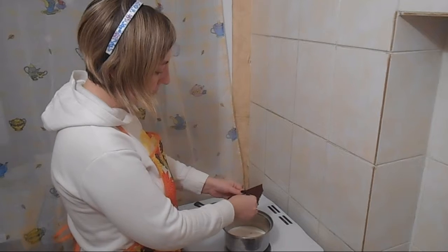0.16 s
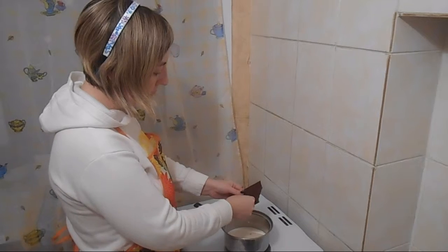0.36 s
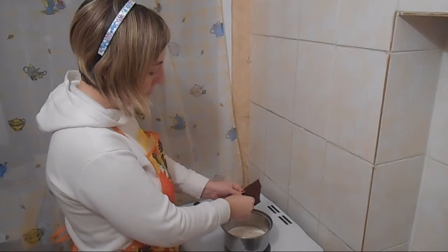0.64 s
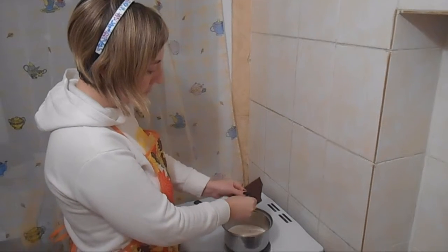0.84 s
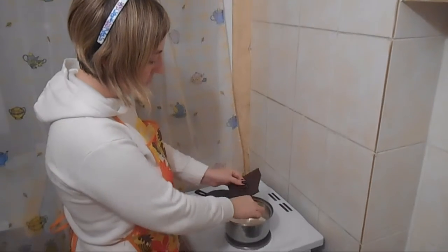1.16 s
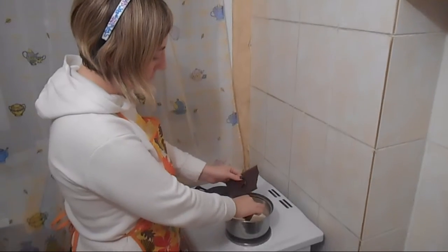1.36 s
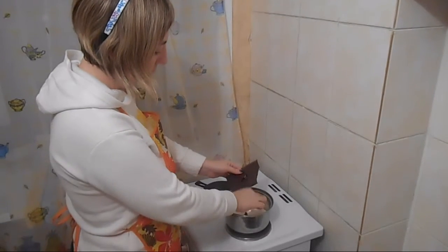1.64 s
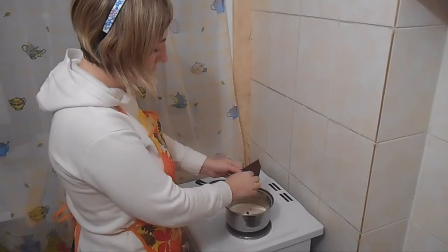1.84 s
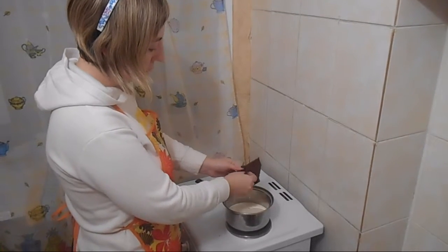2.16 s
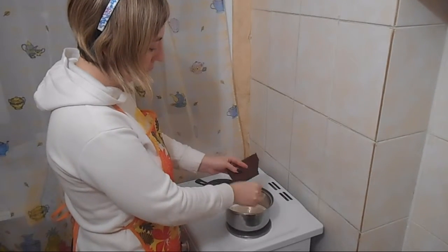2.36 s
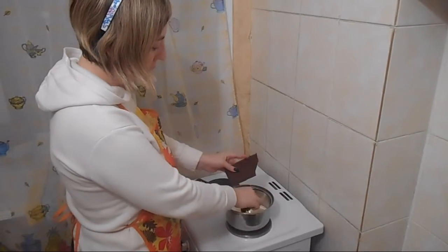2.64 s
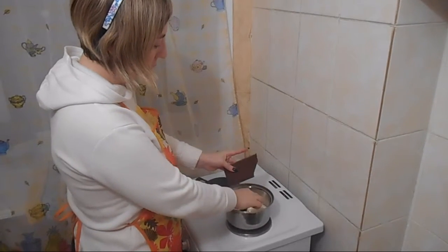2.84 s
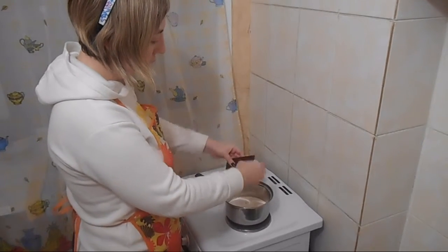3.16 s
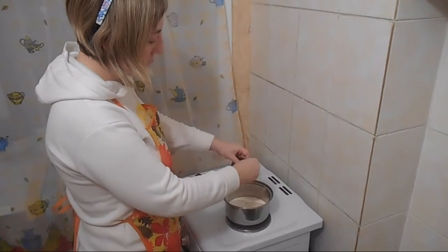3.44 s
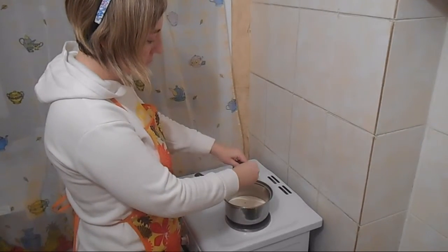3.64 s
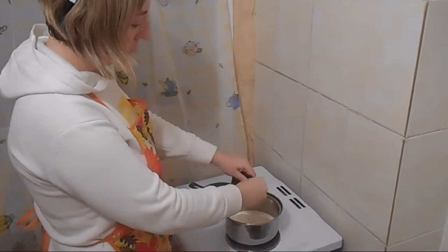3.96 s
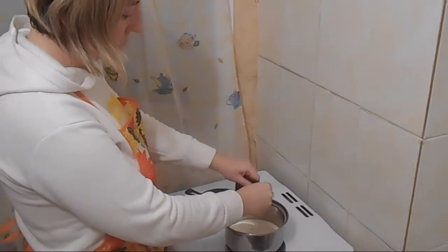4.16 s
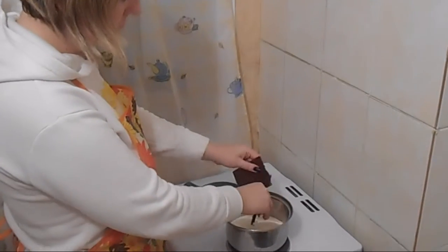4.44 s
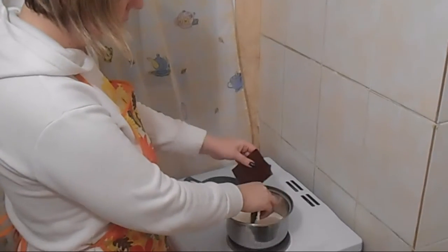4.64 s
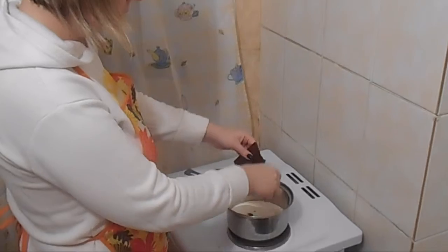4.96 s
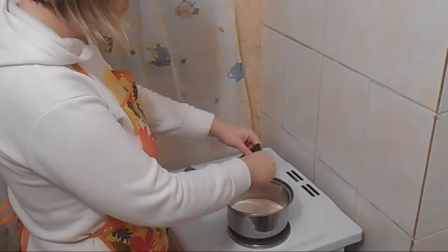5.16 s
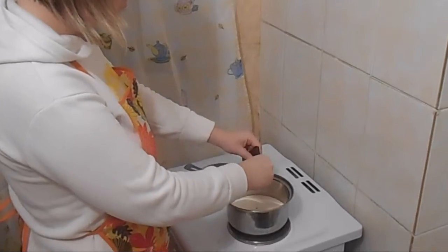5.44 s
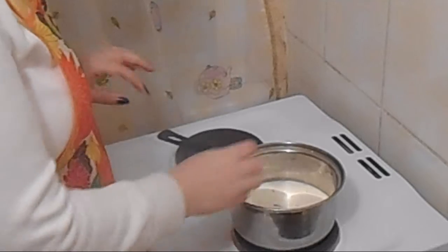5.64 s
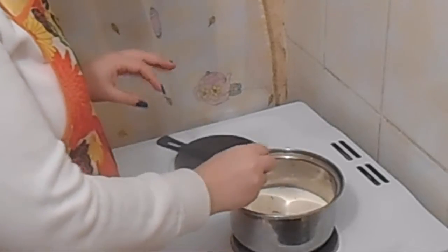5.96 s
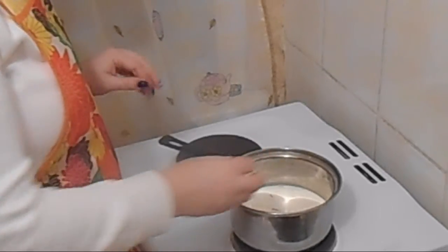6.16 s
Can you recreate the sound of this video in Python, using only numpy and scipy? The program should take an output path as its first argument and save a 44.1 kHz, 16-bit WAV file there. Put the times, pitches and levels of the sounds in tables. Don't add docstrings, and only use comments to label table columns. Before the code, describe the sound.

Fingers and sleeves rustle quietly as chocolate cracks with dry little snaps. Chunks fall into a metal saucepan in three quick clusters, knocking, bouncing and ringing dully, the later ones harder. Between them the handheld camera creaks and ticks under a finger, then gives two loud plastic clunks. The pot finally sings very faintly. Short tiled-room reflections, little bass, continuous soft hiss.

```python
import sys
import numpy as np
from scipy import signal
from scipy.fft import rfft, irfft
from scipy.io import wavfile

SR = 44100
rng = np.random.default_rng(int(sys.argv[2]) if len(sys.argv) > 2 else 0)


def wav_out(sig):
    wavfile.write(sys.argv[1], SR, np.round(np.clip(np.atleast_2d(sig).T, -1, 1) * 32767).astype(np.int16))


def decibels_to_gain(level_db):
    exponent = np.asarray(level_db, float) / 20
    return 10 ** exponent


N = 278138

# middle_s, length_s, level_db, brightness_db
STROKES = [(0.076, 0.19, -58.5, 2), (0.285, 0.95, -64, 0.5), (0.603, 0.17, -63.5, -6),
           (0.826, 0.3, -64.5, -0.5), (1.18, 0.43, -68, 6), (1.88, 0.43, -74, -2), (2.1, 0.32, -69, 0),
           (2.567, 0.48, -59.5, 7.5), (2.71, 0.48, -66, 18), (3.12, 0.25, -59.5, -4), (3.247, 0.25, -52, 7),
           (3.426, 0.26, -52.5, 7), (3.675, 0.16, -57.5, 6), (4.162, 0.046, -65, -3),
           (4.243, 0.21, -60, 14), (4.347, 0.13, -56, 10), (4.476, 0.18, -67, 12), (4.703, 0.36, -65.5, 9),
           (5.143, 0.97, -69, -8.5), (5.226, 0.29, -68, -15), (5.31, 0.44, -61, 7), (5.601, 0.3, -65.5, -2),
           (5.76, 0.23, -58, 10), (5.893, 0.23, -53, 12), (5.996, 0.038, -61.5, -7.5),
           (6.146, 0.073, -57.5, 11), (6.31, 0.12, -52, 4)]
# frequency_hz, density_db (per Hz)
DULL_RUB = [(88, -69), (150, -29.5), (757, 5.5), (885, -6), (1070, 0.5), (1740, -7), (2200, -4.5),
            (2860, -41.5), (4840, -120)]
# frequency_hz, density_db (per Hz)
BRIGHT_RUB = [(880, -50.5), (1500, -2.5), (1820, -8.5), (1990, 0), (2400, -6.5), (2630, -5), (3170, -3.5),
              (3790, -7), (4950, -14), (6000, -14.5), (7800, -64), (13200, -120)]
# frequency_hz, density_db (per Hz)
SQUEAKY_RUB = [(2940, -27), (5000, 1.5), (6210, -2.5), (7320, -7.5), (8060, -15), (10500, -10),
               (13600, -79), (22000, -120)]
# start_s, peak_db, main_ring_db, hardness_db, low_ring_db (last three relative)
DROPS = [(0.247, -44.5, -7.5, -17, 7), (0.279, -39, -28, -14, -6), (0.539, -48, -12, -13, 4),
         (0.956, -42.5, -18, -32, 1), (1.6255, -24.5, -3.5, -16, -3), (1.642, -28, -12, -9, -1),
         (1.6575, -24.5, -11, -20, -4), (1.678, -35.5, -1, -18, -2), (1.7168, -27, 2, -15.5, -4),
         (1.758, -38, 1, -20, -3), (1.905, -44, -13, -10, 4), (1.946, -48.5, 2.5, -20, -4),
         (2.117, -36.5, -1.5, -13, -18), (2.558, -42, -17, -21, -4), (2.9548, -20.5, -4.5, -15, -1),
         (2.9645, -20.5, -12, -19, -5), (3.005, -23, -13, -15, 2), (3.038, -34.5, -27, -14, -2),
         (3.404, -47, -5.5, -14, -6), (4.11, -48, -14, -2, -12), (4.15, -60.5, -24, 12.5, -2),
         (4.25, -54, 0, -4, -6), (4.8612, -27, -28, -14, -4), (4.8862, -16.5, -7, -17, -12),
         (4.903, -24.5, 0.5, -19, -14), (4.928, -26.5, -30, -21, -10), (5.038, -43.5, 0, -9, -13),
         (5.16, -45, -4, -18, -4), (5.168, -42, -2, -20, -11), (5.232, -46.5, -1, -12, -12),
         (1.65, -33, -10, -10, -6), (1.743, -38.5, 0, -15, -2), (1.782, -41, 0, -14, -1),
         (2.985, -27, -11, -16, 8.5), (3.058, -39, -20, -14, 1), (4.87, -43, -24, -16, 3),
         (4.945, -30.5, -15, -20, -3), (4.97, -38, -9, -15, -2), (1.731, -35.5, 2.5, -15, -6),
         (5.205, -51.5, -4, -19, -13)]
# start_s, boom_db
THUMPS = [(0.538, -59.5), (1.628, -38), (1.645, -58), (1.906, -63.5), (2.954, -40), (3.006, -52),
          (3.04, -67), (4.862, -33.5), (4.884, -34.5), (4.927, -49), (5.041, -51), (5.159, -62),
          (2.57, -66), (.27, -64)]
# pitch_hz, level_db, t60_s
POT_MODES = [(174, -13, 0.85), (241.7, 2, 0.21), (250, -2, 0.71), (346.4, -11, 0.73), (455.5, -18.5, 0.64),
             (514.3, -6.5, 0.18), (607, -3.5, 0.18), (690, -4.5, 0.2), (730, -6.5, 0.14),
             (802.3, 8.5, 0.18), (828, 5, 0.11), (866, -11.5, 0.2), (1055, -0.5, 0.15),
             (1122, -17.5, 0.093), (1226, 2, 0.048), (1327, -8.5, 0.085), (1412, -4, 0.15),
             (1530, -8, 0.13), (1588, -4, 0.24), (1876, -12, 0.28), (1990, -6, 0.13), (2217, -12.5, 0.27),
             (2293, -2, 0.1), (2640, 0, 0.074), (2860, -22, 0.12), (3200, -3.5, .05), (3170, -7, 0.072),
             (3900, 3.5, 0.018), (4556, -14.5, .06), (4870, -7, 0.073), (5900, -14, 0.047)]
# start_s, peak_db, body_db (400-1600 Hz), edge_db (4020-5850 Hz), top_db (6000-11000 Hz)
SNAPS = [(0.2544, -45, 4.5, -9, -20), (0.295, -46, -17, -10, 0.5), (0.6576, -32, 0, -0.5, -3.5),
         (0.663, -43, 0, -10, -11), (0.79, -45, -24, -3, 4), (0.7925, -43, -22, 0, 3.5),
         (0.795, -39, -20, 1, 0), (0.798, -40, -20, -11, 3), (0.8015, -43, -18, -15, -2),
         (0.806, -40, -20, -14, -8), (0.829, -47, -20, -9, -6), (1.1313, -49.5, -11, -13, -14),
         (0.9263, -53, -23, -19, -22), (1.1644, -60, -7, 5, 9), (1.7172, -57, -10, 5, 4),
         (1.7235, -60, -10, 5, 6), (1.645, -57, -10, 9, 0), (2.956, -46, -10, 5, 0),
         (3.004, -50, -10, 9, 4), (3.016, -54, -10, 9, 4), (2.7194, -64.5, -13, 14, -17),
         (3.5344, -54, 6.5, -3, -2), (3.586, -50.5, 1, -6, -10), (3.6648, -47, -8, -24, -11),
         (3.968, -15.5, -19, -6, -11), (3.9915, -39, -14, 0, -14), (3.9775, -34, -14, -11, -14),
         (4.0042, -36, -17, -12, -14), (4.0297, -38, -20, -12, -20), (4.132, -42.5, -22, -8, -9),
         (4.2578, -45.5, 4.5, -23, -12), (4.409, -56.5, 3, -4, 4), (4.8423, -53, -15, 1, -11),
         (5.8577, -42.5, -9, 0.5, 0)]
# start_s,
# peak_db, pitch_hz, width_hz, after_ring_db (relative)
POPS = [(.397, -51, 670, 70, -30), (.612, -36, 520, 400, -14), (.613, -42, 710, 200, -8),
        (.8798, -37.5, 620, 170, -7.5), (4.2695, -31.5, 690, 170, -12), (4.4644, -40.5, 2030, 500, -16),
        (5.5007, -13, 1015, 205, -17), (5.501, -27, 600, 200, -43), (5.8405, -20, 700, 250, -40),
        (5.8413, -36, 1410, 120, -40), (3.9685, -21, 2160, 200, -60), (3.9688, -36, 8300, 500, -40),
        (3.3142, -47, 9370, 300, -40), (5.5075, -36, 750, 200, -40), (5.995, -50, 700, 150, -40),
        (4.2745, -39, 600, 110, -30), (4.153, -48, 820, 120, -30), (4.411, -51, 800, 100, -30),
        (4.4648, -50, 650, 200, -30), (4.4945, -52, 650, 200, -30), (5.8402, -19, 1040, 240, -12),
        (6.2914, -38, 404, 37, -40), (6.293, -51, 840, 65, -40), (6.295, -54, 1250, 50, -40)]
# start_s, peak_db, pitch_hz, width_hz, edge_db (relative)
TICKS = [(0.9143, -49, 2500, 900, -8), (.929, -46.5, 2800, 900, -5.5), (2.9295, -42, 1900, 900, -6),
         (2.992, -30, 5440, 900, -8), (2.999, -29, 8450, 600, -45), (2.9994, -27.5, 3300, 450, 3),
         (3.1632, -45.5, 3180, 300, -14), (3.3125, -38.5, 2850, 90, -40), (3.314, -36, 3300, 700, -2),
         (3.3142, -46, 7200, 600, -40), (3.4513, -33, 2930, 600, -28), (3.584, -49, 6760, 900, -10),
         (3.613, -47, 3070, 500, -20), (3.666, -49, 4900, 700, -10), (3.6996, -40, 3070, 500, -14),
         (4.256, -46, 1510, 600, -5), (4.411, -54, 5940, 700, 3), (4.494, -41.5, 1960, 700, -22),
         (5.5012, -33, 2000, 250, -31), (5.5068, -20.5, 3370, 564, -14), (5.5064, -34, 6650, 600, -30),
         (5.8385, -17, 3306, 247, -15), (5.839, -48, 7300, 350, -29), (5.839, -36, 4250, 400, -30),
         (5.842, -37, 2620, 250, -30), (3.4514, -41, 1900, 400, -30), (3.6996, -49, 1650, 500, -30),
         (3.666, -45, 1500, 400, -30), (3.314, -40, 5130, 500, -30), (4.4641, -47, 3000, 400, -30),
         (3.2137, -55, 3200, 400, -14), (3.2424, -50, 3100, 400, -14), (3.3898, -49, 3055, 400, -14),
         (3.4182, -45, 3200, 400, -14), (3.49, -54, 3100, 400, -14), (3.5589, -54, 3100, 400, -14),
         (3.6432, -58, 3100, 400, -14), (5.838, -22.5, 1660, 260, -41), (5.8384, -32, 5020, 300, -40),
         (5.84, -24, 2220, 298, -43)]
# pitch_hz, level_db, t60_s
SHELL_MODES = [(636, -10, 0.11), (548, -10.5, 0.027), (794, -5, .025), (1060, -5, 0.032),
               (1410, -10.5, 0.023)]
# start_s, peak_db, pitch_hz, t60_s
KNOCKS = [(0.658, -28.5, 3250, 0.009), (0.659, -38.5, 1410, 0.031), (0.791, -41, 2150, 0.036),
          (1.619, -55, 4000, .012), (1.722, -46.5, 2300, 0.17), (4.8425, -42, 3850, .008),
          (4.8615, -40, 1500, .04), (4.862, -48, 5150, .015), (4.861, -42, 3200, .012),
          (4.886, -35, 3950, .01), (4.887, -38, 5000, .012), (4.928, -35, 1450, .06),
          (4.887, -33, 1550, 0.096), (4.905, -37.5, 1380, 0.11), (2.12, -49.5, 1800, .05),
          (5.167, -43, 800, 0.08), (5.234, -52, 1600, .12), (3.9715, -23, 4220, 0.012),
          (4.028, -40, 2100, .015), (1.645, -34.5, 2340, 0.052), (1.719, -47, 6100, 0.005),
          (1.742, -43, 800, .03), (1.753, -41, 790, .03), (1.762, -38, 810, .025), (1.783, -47, 800, .04),
          (1.724, -48, 7300, .004), (1.722, -42, 2900, .03), (1.74, -46, 2600, .05),
          (1.718, -35, 2670, 0.02), (1.67, -41, 1330, 0.04), (2.119, -46.5, 1448, 0.15),
          (2.12, -56, 5160, .02), (2.954, -35, 3900, 0.036), (2.974, -40, 3850, .03),
          (2.957, -41, 5750, .008), (2.964, -42, 4900, .01), (2.96, -33, 2350, .03),
          (2.958, -36, 3100, .02), (3.022, -52, 5200, .03), (3.036, -38, 1450, .03),
          (3.9685, -23, 2160, 0.016), (3.9678, -22.5, 4800, 0.015), (4.886, -22, 2400, 0.0093),
          (4.9, -43.5, 345.5, 0.63), (5.166, -43, 1040, 0.1), (5.208, -49, 1030, .08),
          (5.16, -47.5, 690, 0.12), (5.162, -56, 2640, 0.097), (5.237, -51, 2500, 0.033),
          (5.582, -54, 1410, 0.081)]
# middle_s, length_s, level_db
DRAGS = [(3.178, 0.087, -57), (3.25, 0.2, -58), (3.285, .05, -60), (3.425, 0.097, -59), (3.566, 0.21, -64),
         (3.685, 0.16, -63), (4.14, 0.12, -63), (4.254, 0.21, -62), (4.37, 0.15, -62.5)]
# pitch_hz, level_db, t60_s
DRAG_MODES = [(883, -3, 0.05), (2030, 4, 0.02), (3070, 5, 0.025), (3300, 2, 0.03), (5170, -7, .008),
              (7300, -3, 0.0046)]
# middle_s, length_s, level_db
SQUEAK = (3.235, .14, -63)
# time_s, level_db
SIMMER = [
    (5.75, -91),
    (5.9, -76),
    (6.1, -67),
    (6.3, -71.5),
]
# frequency_hz, t60_s
KITCHEN_T60 = [(300, 0.16), (800, 0.22), (2100, 0.19), (5500, 0.15), (10000, 0.14)]
# frequency_hz, density_db (per Hz)
HISS = [(12, -51.5), (20, -16.5), (72, -15), (262, -8.5), (518, -3.5), (747, -3.5), (830, 0), (1780, -2.5),
        (2190, -1.5), (3340, -4.5), (5640, -10.5), (7930, -18), (9530, -27.5), (10600, -35), (13800, -58.5),
        (22000, -120)]


def at_hz(points, hz):
    point_hz, value = np.array(points).T
    return np.interp(np.log(hz), np.log(point_hz), value)


def rms_one(x):
    return x / np.sqrt(np.mean(x ** 2) + 1e-20)


def band(x, low_hz, high_hz):
    return signal.sosfilt(signal.butter(2, [low_hz, high_hz], "band", fs=SR, output="sos"), x)


def clicks(times_s, sizes):
    out = np.full(N, 1e-18)
    places = np.round(np.asarray(times_s) * SR).astype(int)
    np.add.at(out, np.minimum(places, N - 1), sizes)
    return out


def ring(x, hz, t60):
    decay = decibels_to_gain(-60 / (t60 * SR))
    angle = 2 * np.pi * hz / SR
    return signal.lfilter([0, np.sin(angle)], [1, -2 * decay * np.cos(angle), decay ** 2], x)


def coloured(white, spectrum):
    hz = np.maximum(np.fft.rfftfreq(N, 1 / SR), 1)
    return rms_one(irfft(rfft(white) * decibels_to_gain(at_hz(spectrum, hz)), N))


def kitchen(x, wet_db):
    t = np.arange(SR // 2) / SR
    edges_hz = 100 * 2 ** np.arange(0, 7.6, .5)
    white = rng.standard_normal((2, len(t)))
    tail = np.zeros(len(t))
    for k, (low, high) in enumerate(zip(edges_hz, edges_hz[1:])):
        t60 = at_hz(KITCHEN_T60, np.sqrt(low * high))
        tail += band(white[k % 2], low, high) * decibels_to_gain(-60 * t / t60)
    tail *= 1 - np.exp(-t / 0.00058)
    return x + decibels_to_gain(wet_db) * signal.fftconvolve(x, tail)[:N]


def strokes(middle_s, length_s, level_db):
    roundness = 1.9
    t = np.arange(0, N + 64, 64)[:, None] / SR
    swell = np.clip(1 - (2 * (t - middle_s) / length_s) ** 2, 0, 1) ** roundness
    gain = np.sqrt(np.sum((swell * decibels_to_gain(level_db)) ** 2, axis=1))
    return np.interp(np.arange(N) / SR, t[:, 0], gain)


def rubbing():
    middle_s, length_s, level_db, bright_db = np.transpose(STROKES)
    hold_db = -75.5
    slips = rng.random((3, N)) < 2000 / SR
    grains = slips * decibels_to_gain(3 * rng.exponential(1, (3, N)).clip(0, 4))
    grains = grains * rng.choice([-1, 1], (3, N))
    # spectrum, trim dB, dB of level per dB of brightness
    shares = [(DULL_RUB, 0, -0.95), (BRIGHT_RUB, 0, 0), (SQUEAKY_RUB, -12, 0.52)]
    layers = 0
    for grain, (spectrum, trim_db, follows) in zip(grains, shares):
        gain = decibels_to_gain(hold_db) + strokes(middle_s, length_s, level_db + follows * bright_db)
        layers = layers + decibels_to_gain(trim_db) * gain * coloured(grain, spectrum)
    return decibels_to_gain(-6.0) * kitchen(layers, -35.0)


def pot():
    start_s, peak_db, main_db, hard_db, low_db = np.transpose(DROPS)
    wall_db = -8 - 0.036 * (peak_db - peak_db.mean())
    contact = np.exp(-np.arange(SR // 20) / SR / 0.0027)
    rattle = rng.standard_normal(N)

    def contact_noise(relative_db):
        return signal.fftconvolve(clicks(start_s, decibels_to_gain(peak_db + relative_db)), contact)[:N] * rattle

    plop, wall, hard = contact_noise(0), contact_noise(wall_db), contact_noise(hard_db)
    clatter = decibels_to_gain(8.5) * band(hard, 1410, 3100) + decibels_to_gain(-8.0) * band(hard, 4300, 4630)
    clatter += decibels_to_gain(11.5) * band(wall, 850, 1723) + decibels_to_gain(-1.0) * band(plop, 610, 890)

    slosh_hz, slosh_share = 90, 0.24
    waves = rms_one(ring(rattle, slosh_hz / 2, 1 / slosh_hz))
    chance = rng.standard_normal((60, 2, len(POT_MODES)))
    rings = 0
    for k, (hz, level_db, t60) in enumerate(POT_MODES):
        if hz < 400:
            when_s, blow_db = np.transpose(THUMPS)
        else:
            when_s = start_s
            if hz < 560:
                group_db = low_db
            elif hz < 760:
                group_db = 0
            elif hz < 900:
                group_db = main_db
            elif hz < 1700:
                group_db = wall_db
            else:
                group_db = hard_db
            blow_db = peak_db + group_db
        level_chance, delay_chance = chance[:len(when_s), :, k].T
        size = decibels_to_gain(blow_db + level_db - 14.5 + 2.5 * level_chance)
        blows = clicks(when_s + 0.001965 * np.abs(delay_chance), size * (-1) ** k)
        soft = ring(blows, hz, 10.96 / hz) * hz / SR * 2.23
        mode = ring(soft, hz, t60)
        if hz >= 400:
            slosh = np.roll(waves, k * SR // 9)
            mode = mode * decibels_to_gain(-2) * (1 - slosh_share + slosh_share * slosh)
        rings = rings + mode
    return kitchen(clatter, -23.0) + kitchen(rings, -33.5) * decibels_to_gain(0.5)


def snaps():
    start_s, peak_db, body_db, edge_db, top_db = np.transpose(SNAPS)
    bands = [(body_db, -3, 400, 1600), (0, 0, 1803, 3478), (edge_db, 3, 4020, 5850), (top_db, 2, 6000, 11000)]
    out, sign = 0, 1
    for rel_db, trim_db, low, high in bands:
        sign = -sign
        size = sign * decibels_to_gain(peak_db + rel_db + trim_db) * SR / 2 / (high - low)
        crack = band(clicks(start_s + .0006, size), low, high)
        out = out + band(crack, 0.8 * low, 1.59 * high)
    room = kitchen(out, -24.0) - out
    return decibels_to_gain(-5.5) * out + decibels_to_gain(0.5) * room


def shell():
    out = np.zeros(N + SR)
    t = np.arange(SR // 20) / SR
    for start_s, peak_db, hz, width_hz, _ in TICKS + POPS:
        swell = np.pi * width_hz * t
        envelope = swell ** 2 * np.exp(2 - 2 * swell)
        out[round(start_s * SR):][:len(t)] += decibels_to_gain(peak_db) * envelope * np.sin(2 * np.pi * hz * t)
    for start_s, peak_db, _, _, edge_db in TICKS:
        noise = rng.standard_normal(len(t))
        edge = band(noise * np.exp(-t / 0.0014), 3830, 6160)
        out[round(start_s * SR):][:len(t)] += decibels_to_gain(peak_db + edge_db + 6.5) * edge
    start_s, peak_db, _, _, ring_db = np.transpose(POPS)
    blows = clicks(start_s + 0.00386, decibels_to_gain(peak_db + ring_db))
    body = sum(decibels_to_gain(level_db) * ring(blows, hz, t60) for hz, level_db, t60 in SHELL_MODES)
    return band(out[:N] + body, 300, 15000)


def knocks():
    rings = sum(ring(clicks([start_s], decibels_to_gain(peak_db)), hz, t60) for start_s, peak_db, hz, t60 in KNOCKS)
    return kitchen(band(rings, 260, 9000), -26.5)


def drag():
    sizes = rng.standard_normal(N) * decibels_to_gain(2.7 * rng.exponential(1, N).clip(0, 4))
    slips = sizes * (rng.random(N) < 2500 / SR)
    body = rms_one(sum(decibels_to_gain(level_db) * ring(slips, hz, t60) for hz, level_db, t60 in DRAG_MODES))
    squeak = rms_one(band(ring(slips, hz=7100, t60=0.003), 6600, 8800))
    return strokes(*np.transpose(DRAGS)) * body + strokes(*SQUEAK) * squeak


def simmer():
    time_s, level_db = np.transpose(SIMMER)
    gain = decibels_to_gain(np.interp(np.arange(N) / SR, time_s, level_db))
    return gain * rms_one(ring(rng.standard_normal(N), hz=1105, t60=0.046))


def scene():
    return (rubbing() + pot() + snaps() + shell() + knocks() + drag() + simmer())[None]


def roll_off(x):
    return signal.sosfilt(signal.butter(12, 15720, fs=SR, output="sos"), x)


def record(dry):
    sound = signal.sosfilt(signal.butter(2, 140, "high", fs=SR, output="sos"), dry)
    sound = signal.sosfilt(signal.butter(16, 9370, fs=SR, output="sos"), sound)
    hiss = decibels_to_gain(-62.5) * coloured(rng.standard_normal(N), HISS)
    converter = decibels_to_gain(-94.5) * rng.standard_normal(N)
    return roll_off(sound + hiss + converter)


dry = scene()
out = record(dry)
wav_out(out)
```